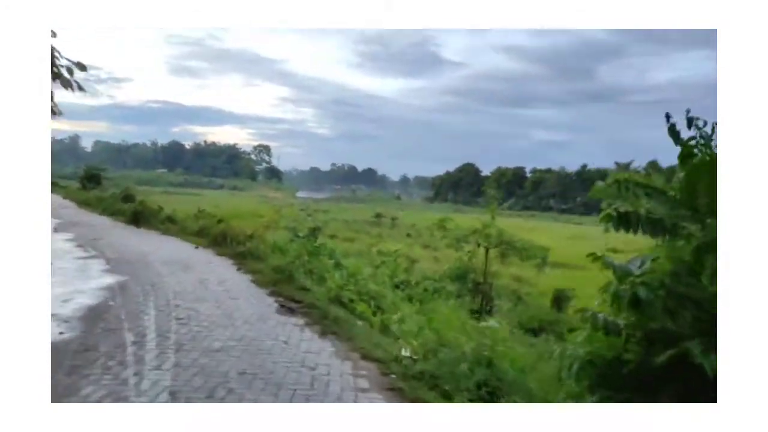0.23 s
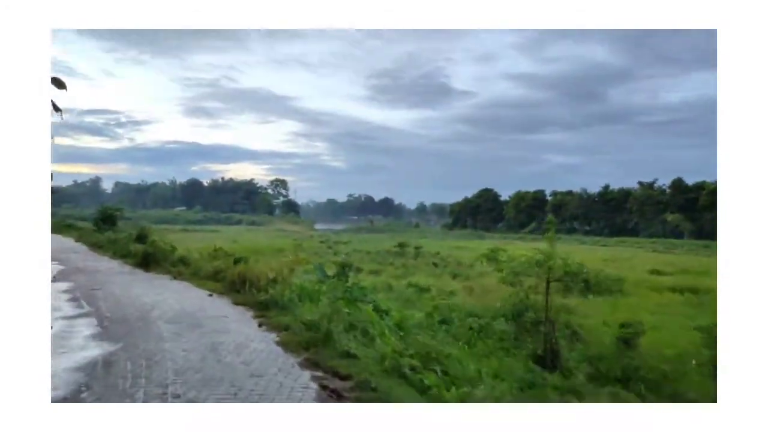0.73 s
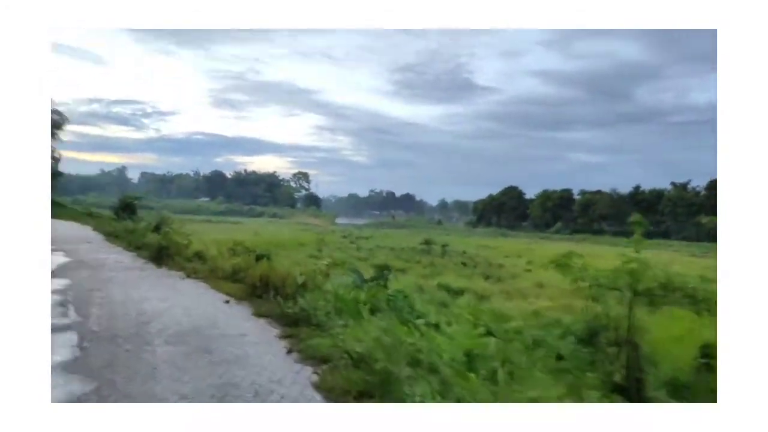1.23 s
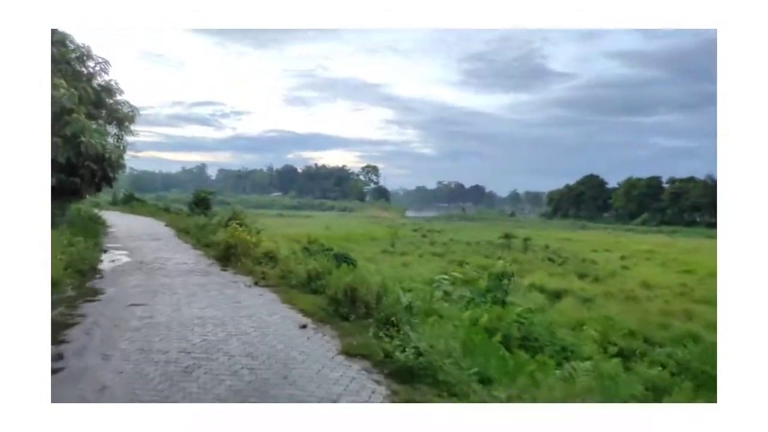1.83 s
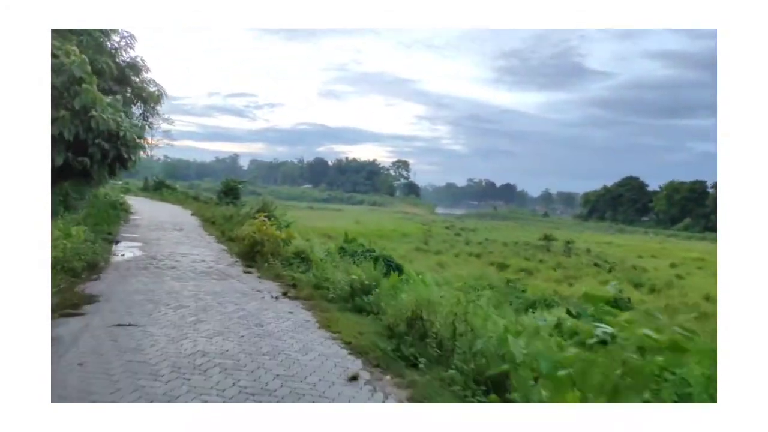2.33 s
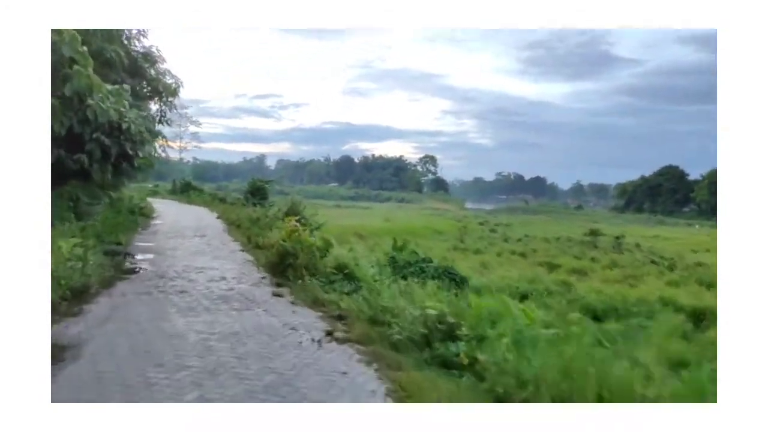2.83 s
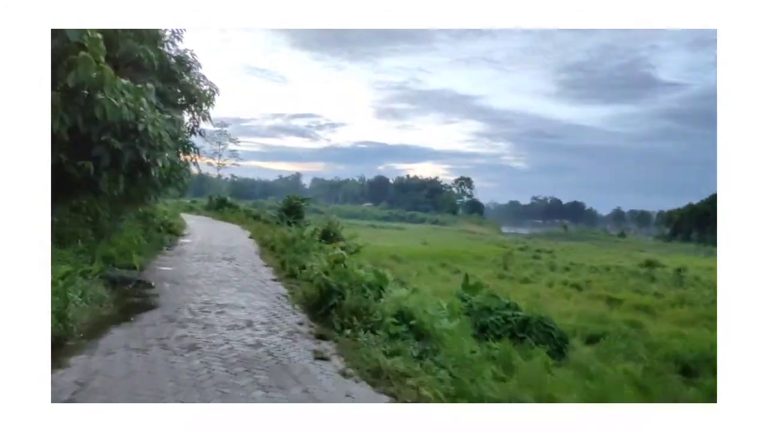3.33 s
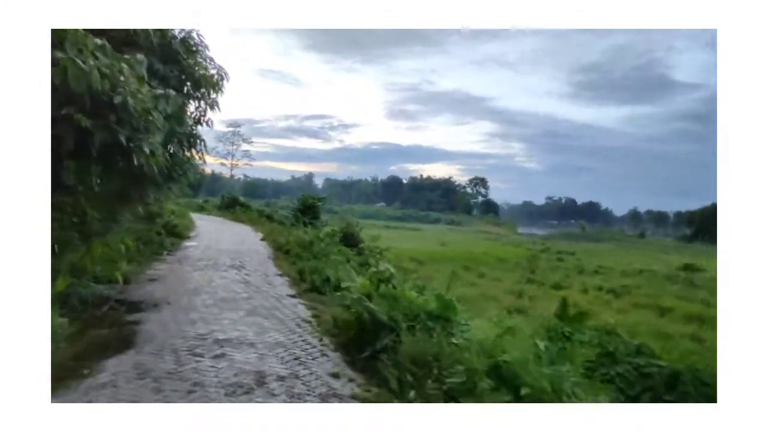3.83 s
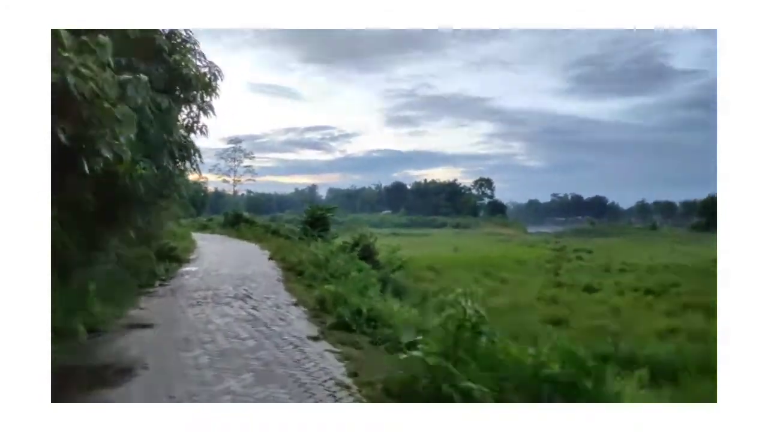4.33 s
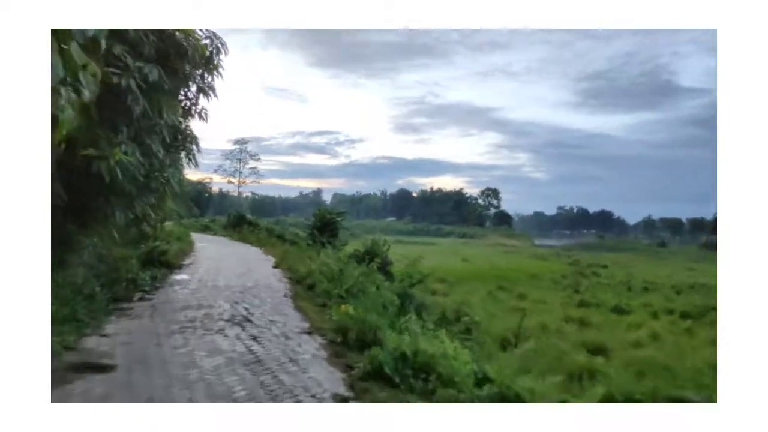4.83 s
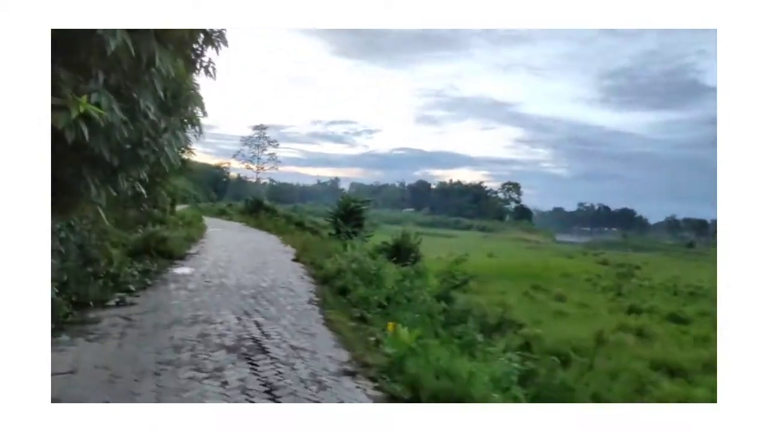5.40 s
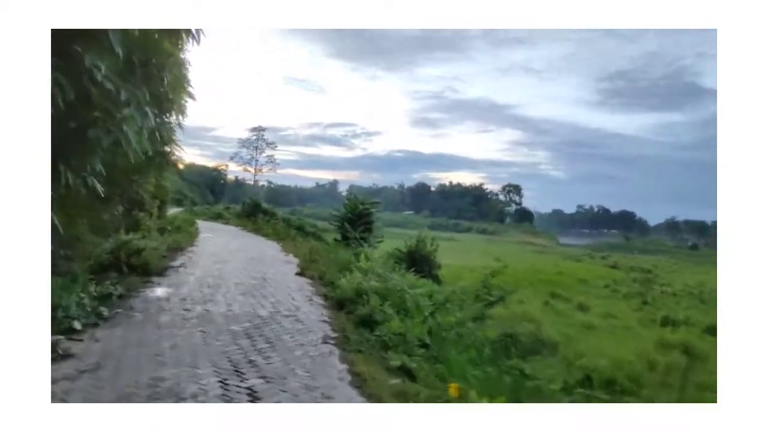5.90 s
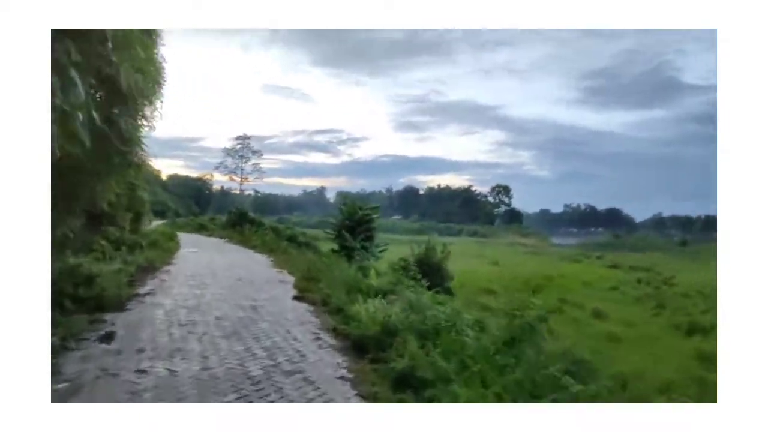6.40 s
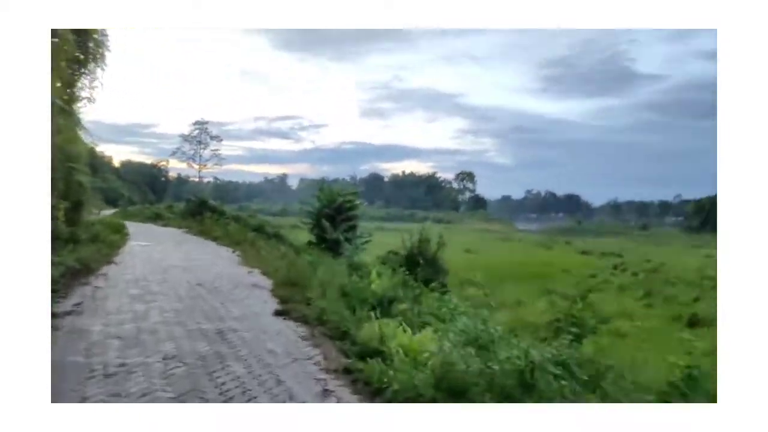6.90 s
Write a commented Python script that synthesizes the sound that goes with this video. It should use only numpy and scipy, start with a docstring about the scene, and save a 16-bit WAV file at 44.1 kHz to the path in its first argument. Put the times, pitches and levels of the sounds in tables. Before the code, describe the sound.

A small single-cylinder motorbike is already running on a brick lane between open fields, heard by a stereo microphone on board. Its low, rough putter, about 20 firings a second, climbs gradually to 24 by 6.3 s, with dry ticks, casing clatter, gear whine and a thin, swelling metallic ringing stronger on the right. Tyres rumble and boom unevenly beneath. High insect hiss is constant; fast cricket trills come from 0 to 1.6 s, then 5.5 to 6.6 s, leaning left. Low wind thumps the left side in irregular gusts, with a hard hit and dull panel knock at 1.8 s, further thumps around 2.3, 2.8 and 3.8 s, and dense buffeting from 5.7 s. Panels knock again at 5.7, 6.1 and 7.0 s. At 6.3 s the throttle closes: the engine quickly softens and drops in pitch, chain slapping lightly, while wind and tyre boom keep growing to the end.

```python
"""Small single-cylinder motorbike on a brick lane between fields at dusk, heard at two microphone ports.
From the start the engine gathers speed over rumbling tyres and crickets trill in the verge; wind thumps
the left port. Panels knock on a bad joint at 1.8 s; trills return at 5.5 s. At 6.3 s the throttle closes and
the note sinks while wind and tyre boom keep growing; panels knock again from 5.7 to 7.1 s.
Sines make engine orders, trills and rings; coloured noise makes wind, tyres and hiss."""
import sys
import numpy as np
from scipy import signal
from scipy.fft import rfft, irfft, next_fast_len
from scipy.io import wavfile
from scipy.ndimage import map_coordinates

SR = 44100
rng = np.random.default_rng(int(sys.argv[2]) if len(sys.argv) > 2 else 0)


def pcm_store(signal):
    """Save signal as 16-bit PCM."""
    levels = np.round(np.clip(np.atleast_2d(signal), -1, 1) * 32767)
    wavfile.write(sys.argv[1], SR, levels.astype(np.int16).T)


N = 315315
TIME_S = np.arange(N) / SR

# Far insects and air hiss at each port: (frequency [Hz], relative density [dB/Hz])
FIELD_LEFT_SPECTRUM = [(1000, -32), (1900, -22), (2450, -20), (2900, -15.5), (3200, -17), (3800, -11),
                       (4250, -17), (4900, -13.5), (5300, -14), (5850, -4.5), (6450, -9), (6800, 0),
                       (7200, -12), (7800, -12)]
FIELD_RIGHT_SPECTRUM = [(1000, -28), (2500, -16), (2900, -13), (3300, -17), (4400, -19), (5300, -17),
                        (5900, -11.5), (6500, -11), (6850, 1), (7100, -3), (7700, -2.5), (8000, -8)]
# Near cricket trills: (start [s], end [s], mid pitch [Hz], level before trim [dB])
CRICKET_TRILLS = [(0, .11, 6900, -59), (.24, .51, 6890, -57), (.66, .93, 6350, -63),
                  (.935, 1.35, 6320, -54), (1.05, 1.64, 6800, -55), (1.39, 1.6, 7050, -59),
                  (5.54, 6.55, 6780, -56.5), (5.95, 6.5, 6540, -56)]
# Wind turbulence: (frequency [Hz], relative density [dB/Hz])
WIND_SPECTRUM = [(12, -35), (25, -5), (50, 2), (90, 0), (140, -7), (200, -12.5), (300, -22), (450, -32),
                 (700, -44.5), (1500, -63.5), (4000, -84.5)]
# Gusts on the left port: (time [s], rise over headwind [dB])
LEFT_GUSTS = [(.35, 7), (.92, 3), (1.82, 6.5), (2.28, 1.5), (2.82, 2.5), (3.87, 1.5), (6.13, 4.5),
              (6.75, 5)]
# Gusts reaching the sheltered right port: (time [s], rise over lee wind [dB])
RIGHT_GUSTS = [(2.95, 5), (5.45, 6), (6.0, 8), (6.6, 9)]
# Single eddies on the left port:
# (time [s], peak before trim [dB], nominal pitch [Hz], half length [s], puff level before trim [dB])
EDDY_HITS = [(.173, -21.5, 172, 0.0096, -36), (0.42, -18, 118.7, 0.012, -33), (.98, -15.5, 110, 0.01, -42),
             (1.785, -7, 140, .010, -22.5), (2.221, -14.5, 109, 0.011, -39), (2.275, -11, 104, 0.0042, -31),
             (2.29, -18, 119, 0.0061, -35), (2.772, -15.5, 125, .008, -25.5),
             (2.824, -19.5, 123.5, 0.012, -38), (3.322, -12.5, 99, 0.0097, -34),
             (3.807, -12.5, 102.6, 0.012, -33), (3.851, -13, 161, 0.0048, -35),
             (3.865, -13, 110, 0.0068, -35), (3.88, -21, 106, 0.0093, -31.5),
             (4.522, -16, 129, 0.01, -38.5), (4.843, -14.5, 116.6, 0.0077, -27.5),
             (4.88, -15.5, 104.3, 0.013, -41), (5.709, -19, 150, 0.012, -37),
             (5.729, -17, 174, 0.0059, -30), (5.748, -10.5, 239, 0.0033, -22.5),
             (5.81, -11.5, 89.4, 0.0059, -30), (5.845, -20.5, 152, 0.013, -34),
             (5.928, -14, 105, 0.0048, -31.5), (6.001, -12, 115, 0.0042, -26.5),
             (6.042, -18.5, 167, 0.006, -37), (6.104, -7.5, 105, 0.0063, -25.5),
             (6.178, -11.5, 129, .006, -27), (6.211, -16, 105, .006, -33), (6.229, -14, 140, 0.0071, -24.5),
             (6.307, -13, 116.4, 0.0081, -41), (6.708, -15, 95, 0.0078, -31),
             (6.746, -11.5, 132, 0.0064, -29), (6.767, -14.5, 176.6, .005, -23),
             (6.824, -13.5, 105.3, 0.0074, -32.5), (6.97, -9, 100, 0.0064, -27.5),
             (6.994, -12, 141, 0.006, -23), (7.067, -24, 140, 0.0092, -28),
             (7.095, -11.5, 105.4, 0.0077, -29.5)]
# Fine turbulence in an eddy: (frequency [Hz], relative density [dB/Hz])
PUFF_SPECTRUM = [(110, -10), (220, 0), (320, -1), (430, -9), (600, -19), (800, -30), (1500, -54),
                 (4000, -87)]
# Boom of the hollow tyres: (frequency [Hz], relative density [dB/Hz])
DRUM_SPECTRUM = [(60, -7), (160, 1.5), (240, 0), (330, -7), (450, -10.5), (650, -12.5), (1000, -20),
                 (2500, -57.5)]
# Tyre rumble: (frequency [Hz], relative density [dB/Hz])
TYRE_SPECTRUM = [(30, -2), (70, 1.5), (170, -9), (300, 4), (480, -9), (730, -3.5), (1150, -10), (1600, -19),
                 (2200, -26.5), (4000, -28.5), (8000, -56)]
# Jolts at the worst joints: (time [s], strength [dB])
PANEL_JOLTS = [(1.777, -39), (5.744, -35.5), (6.104, -37), (6.98, -33.5), (6.994, -39), (7.064, -44)]
# Panel modes: (frequency [Hz], mean relative level [dB], t60 [s])
PANEL_MODES = [(453, 0, 0.025), (578, -6, 0.03), (647, -2.5, 0.036), (720, -3.5, 0.041), (856, -8.5, 0.032)]
# Level of the guard's sung note: (time [s], mean level [dB rms])
SING_LEVEL = [(0, -72), (.95, -73), (1.25, -64), (1.55, -63.5), (1.8, -69), (2.2, -64.5), (2.7, -64.5),
              (2.9, -70), (3.14, -63), (3.33, -68), (3.7, -64), (4.15, -67.5), (4.35, -62), (4.75, -71),
              (5.8, -71), (6.2, -65), (6.8, -73)]
# Firing rate, throttle open: (time [s], firings per second [Hz])
FIRING_RATE = [(0.0, 20.1), (0.56, 20.65), (0.95, 21.42), (1.81, 22.28), (2.02, 22.08), (2.21, 22.55),
               (3.16, 22.5), (3.41, 23.08), (3.72, 22.69), (4.13, 22.98), (4.27, 22.52), (4.76, 23.38),
               (4.99, 23.19), (5.25, 23.86), (5.46, 23.23), (6.29, 23.99)]
# Exhaust orders: (multiple of firing rate [-], level before trim and load [dB rms])
EXHAUST_ORDERS = [(1, -55), (2, -49.5), (3, -50), (4, -41.6), (5, -45.4), (6, -49), (7, -63), (8, -61),
                  (9, -50.5), (10, -50), (11, -59), (12, -52.5), (13, -56), (14, -55), (15, -58.5),
                  (16, -63), (17, -61), (18, -62), (19, -59.5), (20, -66)]
# Gear mesh tones: (multiple of firing rate [-], relative level [dB], phase waver [rad])
GEAR_TONES = [(17, -29, .4), (19, -34, .4), (23, -29, .5), (24, -22.3, .4), (35, -30, .5), (27, -31, .5),
              (40, -35, .6), (44, -27, .6), (85, -25, .8)]
# Engine casing resonances: (frequency [Hz], width [Hz], relative gain [dB])
CASING_MODES = [(430, 55, -4), (540, 28, -5), (620, 50, -11), (700, 18, -8), (775, 30, -5.5),
                (900, 55, -5.5), (995, 35, -9), (1118, 22, -11), (1205, 22, -16), (1300, 35, -14),
                (1690, 35, -21), (1752, 25, -21), (1888, 40, -20.5), (2020, 80, -25.5), (2145, 22, -26),
                (2410, 22, -22), (2700, 20, -26), (3540, 80, -25)]
# Chain guard resonances: (frequency [Hz], width [Hz], relative gain [dB])
GUARD_MODES = [(1372, 55, -1), (1498, 25, -4), (1527, 18, 0), (2900, 70, -22), (3820, 90, -16)]
# Dry tick of each firing: (frequency [Hz], relative density [dB/Hz])
TICK_SPECTRUM = [(600, -24), (1200, -0.5), (2200, -5), (3500, -15), (6000, -36.5)]
# Intake hiss: (frequency [Hz], relative density [dB/Hz])
INTAKE_SPECTRUM = [(1000, -16), (2300, 0), (3500, 1), (5200, 2), (6500, 4.5), (8000, -17.5)]
# Port level difference from below the rider: (frequency [Hz], left minus right [dB])
PORT_PAN = [(100, 3.5), (300, 0.5), (550, -1), (800, -1), (1000, -6.5), (1300, -7.5), (1550, -14),
            (1900, -18), (2500, -11), (3500, -1)]
# Port phase difference from below the rider: (frequency [Hz], left lead [rad])
PORT_LEAD = [(100, -.2), (300, -.8), (600, -.9), (950, -2.1), (1500, -1.6), (1700, -2.8), (2400, -.3),
             (3700, -.4), (4250, -3)]

# Hiss at mean firing rate, throttle open; gain per extra firing/s; change when coasting
HISS_LEFT_DB, HISS_RIGHT_DB, HISS_DB_PER_HZ, HISS_COAST_DB = -51.0, -51.5, 0.94, 1
# Far cricket, level before trim; pan is for all crickets, left minus right
FAR_HZ, FAR_DB, VERGE_PAN_DB = 6890, -66, 5
# Wind between gusts: level at 0 s, growth, gust width
WIND_DB, WIND_DB_PER_S, GUST_WIDTH_S = -31, 1.1645, 0.17
LEE_DB, LEE_DB_PER_S, LEE_GUST_WIDTH_S = -51.5, 2.3, 0.2
DRUM_DB, DRUM_DB_PER_S = -52.5, .4
# Tyre rumble at mean firing rate, throttle open; gain per extra firing/s; change when coasting
ROAD_DB, ROAD_DB_PER_HZ, ROAD_COAST_DB = -44.5, 0.5, -3.5
PANEL_PAN_DB = 6.5
SING_HZ, SING_WANDER_HZ = 1531, 5
# Throttle closing: start, time constant, full load drop, fall of firing rate
CLOSE_S, CLOSING_S, COAST_DB, SAG_HZ_PER_S = 6.3, 0.045, -11, 4.5
FIRST_FIRING_S = .023
# Silencer delay phase per order squared; hot-pipe phase wander, full from this order up
SPREAD_RAD, PIPE_WANDER_RAD, PIPE_WANDER_ORDER = .075, 1.0, 10
# Slack chain on its guard: rate, depth, time of one slap
SLAP_HZ, SLAP_DB, SLAP_S = 15, 3.5, 6.69
# Tick level at firing under load; decay constant as a share of the cycle
TICK_DB, TICK_CYCLES = -55.5, .04
TOP_HZ = 7800


def amp(db):
    """Decibels to gain."""
    return 10 ** (np.asarray(db) / 20)


def unit(x):
    """Scale to rms 1."""
    return x / np.sqrt(np.mean(x ** 2) + 1e-20)


def along(points, hz):
    """Interpolate (Hz, value) points on a log-frequency axis."""
    f, v = np.transpose(points)
    return np.interp(np.log(hz + 1), np.log(f + 1), v)


def curve(points):
    """Interpolate (s, value) points to one value per sample."""
    s, v = np.transpose(points)
    return np.interp(TIME_S, s, v)


def wobble(rate_hz):
    """Smooth random curve with rate_hz knots a second."""
    knots = rng.standard_normal(int(N * rate_hz / SR) + 4)
    return map_coordinates(knots, [np.arange(N) * rate_hz / SR])


def bell(s, width_s):
    """Smooth swell reaching 1 at time s."""
    return np.exp(-((TIME_S - s) / width_s) ** 2)


def filtered(x, response):
    """Apply a complex frequency response, zero-padded."""
    m = next_fast_len(N + SR // 2)
    return irfft(rfft(x, m) * response(np.fft.rfftfreq(m, 1 / SR)), m)[..., :N]


def noise(spectrum):
    """Gaussian noise of rms 1 with the given colour."""
    return unit(filtered(rng.standard_normal(N), lambda hz: amp(along(spectrum, hz))))


def panned(pan_db):
    """Left and right gains for a level difference."""
    return amp(np.array([[.5], [-.5]]) * pan_db)


def ports(x):
    """Sound from below the rider leads at the right port; the left is shaded from most of its treble."""
    half = np.array([[.5], [-.5]])

    def response(hz):
        return panned(along(PORT_PAN, hz)) * np.exp(1j * half * along(PORT_LEAD, hz))
    return filtered(x, response)


def ringing(modes, hz):
    """Minimum-phase, hence causal, response of a metal shell with resonant modes."""
    gain = np.sqrt(sum((amp(db) / (1 + ((hz - c) / w) ** 2)) ** 2 for c, w, db in modes))
    log_gain = np.log(gain + 1e-5)
    mirrored = np.r_[log_gain, log_gain[-2:0:-1]]
    return np.exp(np.conj(signal.hilbert(mirrored))[:len(hz)])


def motion():
    """Firing rate [Hz] and throttle closure (0-1); off the throttle the shaft slows evenly."""
    coasting_s = np.maximum(TIME_S - CLOSE_S, 0)
    rate_hz = curve(FIRING_RATE) - SAG_HZ_PER_S * coasting_s
    return rate_hz, 1 - np.exp(-coasting_s / CLOSING_S)


def under_way(db_per_hz, coast_db):
    """Level change [dB] with firing rate about its mean, and with throttle closure."""
    rate_hz, closed = motion()
    return db_per_hz * (rate_hz - rate_hz.mean()) + coast_db * closed


def field():
    """Countless far insects merge with the hiss of passing air: separate noise at each port."""
    left = amp(HISS_LEFT_DB) * noise(FIELD_LEFT_SPECTRUM)
    right = amp(HISS_RIGHT_DB) * noise(FIELD_RIGHT_SPECTRUM)
    change_db = under_way(HISS_DB_PER_HZ, HISS_COAST_DB)
    return np.array([left, right]) * amp(change_db + .4 * wobble(55))


def crickets(strokes_hz, trim_db, fall_hz, blur_rad, wander_hz, scatter_db):
    """Each wing stroke is a soft, falling note; strokes form fast trills, smeared by the grass."""
    out = np.zeros((2, N))
    far = (0.0016, N / SR, FAR_HZ, FAR_DB)  # no pause
    for start_s, end_s, hz, db in CRICKET_TRILLS + [far]:
        on = (TIME_S > start_s) & (TIME_S < end_s)
        stroke = ((TIME_S[on] - start_s) * strokes_hz + .025 * wobble(12)[on]) % 1
        pitch_hz = hz + fall_hz * (.5 - stroke) + wander_hz * wobble(13)[on]
        smear = blur_rad * np.array([wobble(200)[on], wobble(220)[on]])
        smear = smear + rng.uniform(0, np.pi, (2, 1))
        beat = .08 + .92 * np.sin(np.pi * stroke) ** 2
        size = beat * amp(db + trim_db + scatter_db * wobble(25)[on])
        note = np.sin(2 * np.pi * np.cumsum(pitch_hz) / SR + smear)
        out[:, on] += panned(VERGE_PAN_DB) * size * signal.windows.tukey(on.sum(), .1) * note
    return out


def buffet():
    """Wind turbulence at one port, in quick lumps, rms 1."""
    return unit(noise(WIND_SPECTRUM) * amp(1.2 * wobble(60) + .4 * wobble(9)))


def wind():
    """Growing turbulence buffets each port on its own; slower air in the lee is duller."""
    left_db = WIND_DB + WIND_DB_PER_S * TIME_S
    left_db = left_db + sum(db * bell(s, GUST_WIDTH_S) for s, db in LEFT_GUSTS)
    right_db = LEE_DB + LEE_DB_PER_S * TIME_S
    right_db = right_db + sum(db * bell(s, LEE_GUST_WIDTH_S) for s, db in RIGHT_GUSTS)
    sheltered = unit(filtered(buffet(), lambda hz: 1 / (1 + (hz / 100) ** 2)))
    return np.array([amp(left_db) * buffet(), amp(right_db) * sheltered])


def eddies(puff_share, lead_s, eddy_trim_db, puff_trim_db, wake_db, wake_s):
    """An eddy thumps low, swinging fastest at its core; finer turbulence rides its front and wake."""
    out = np.zeros(N + SR)
    t = np.arange(-SR // 25, SR // 10) / SR
    fine = np.pad(noise(PUFF_SPECTRUM), (0, SR))
    for s, db, hz, length_s, puff_db in EDDY_HITS:
        span = round(s * SR) + np.round(t * SR).astype(int)
        swell = np.exp(-(t / length_s) ** 2)
        swing_hz = hz * (.6 + .55 * swell)
        thump = swell * np.sin(2 * np.pi * (np.cumsum(swing_hz) / SR + rng.uniform()))
        front = np.exp(-((t + lead_s) / (puff_share * length_s)) ** 2)
        wake = (t > 0) * amp(wake_db) * np.exp(-np.abs(t) / wake_s)
        burst = np.maximum(front, wake)
        puff = unit(burst * fine[span]) * np.sqrt(np.mean(burst ** 2))
        out[span] += amp(db + eddy_trim_db) * thump + amp(puff_db + puff_trim_db) * puff
    return out[:N] * amp([[0], [-30]])  # left, right


def drumming():
    """Hollow tyres boom on the brick joints, more as the lane roughens, throttle open or not."""
    boom = noise(DRUM_SPECTRUM) * amp(2.3 * wobble(30))
    return amp(DRUM_DB + DRUM_DB_PER_S * TIME_S) * unit(ports(boom))


def tyres():
    """Tyres rumble over uneven bricks: part comes straight up, part is scattered by the lane."""
    pair = np.array([noise(TYRE_SPECTRUM), noise(TYRE_SPECTRUM)])
    scattered = filtered(pair, lambda hz: panned(along(PORT_PAN, hz)))
    roll = ports(noise(TYRE_SPECTRUM)) + .55 * scattered
    bricks = amp(1.4 * wobble(45))
    return amp(ROAD_DB + under_way(ROAD_DB_PER_HZ, ROAD_COAST_DB)) * bricks * unit(roll)


def rattles():
    """Each jolt knocks the panels: damped modes ring briefly and dully."""
    out = np.zeros(N + SR)
    t = np.arange(SR // 8) / SR
    for s, db in PANEL_JOLTS:
        ring = np.zeros(len(t))
        for hz, mode_db, t60_s in PANEL_MODES:
            decay = amp(mode_db + rng.normal(0, 1.7) - 60 * t / t60_s)
            ring += decay * np.sin(2 * np.pi * (hz * t + rng.uniform()))
        out[round(s * SR):][:len(t)] += amp(db) * ring * (1 - np.exp(-t / .0015))
    return out[:N] * panned(PANEL_PAN_DB)


def singing():
    """The guard's longest-ringing mode holds a thin, swelling note, whatever the engine speed."""
    hz = SING_HZ + SING_WANDER_HZ * wobble(9)
    size = amp(curve(SING_LEVEL) + .8 * wobble(18))
    phase = 2 * np.pi * np.cumsum(hz) / SR + .25 * wobble(45)
    return ports(np.sqrt(2) * size * np.sin(phase))


def whine(cycle):
    """Gear teeth mesh at fixed multiples of the firing rate, blurred by backlash."""
    out = np.zeros(N)
    for order, db, waver_rad in GEAR_TONES:
        tone = np.sin(2 * np.pi * order * cycle + waver_rad * wobble(50))
        out += amp(db) * unit(tone * amp(1.3 * wobble(6)))
    return out


def strikes(cycle, at, scatter_db):
    """One impulse per cycle at phase at, uneven in strength."""
    return np.diff(np.floor(cycle - at), prepend=np.floor(-at)) * amp(scatter_db * wobble(22))


def clatter(cycle, valve, knock_db, scatter_db):
    """Firing knock, closing valve, gears and churn shake the casing and the chain guard."""
    blows = strikes(cycle, 0, scatter_db) + valve * strikes(cycle, .14, scatter_db)
    # churn is partly each port's own, partly shared
    own = filtered(rng.standard_normal((2, N)),
                   lambda hz: along([(1550, .5), (1700, 1), (2500, .9)], hz))
    shared = filtered(rng.standard_normal(N),
                      lambda hz: along([(1550, 1), (1700, .5), (2500, .6)], hz))
    churn = unit((shared + own) * (1 + .2 * np.exp(-(cycle % 1) / .2)))
    gears = amp(under_way(db_per_hz=-1.0, coast_db=-7.5)) * whine(cycle)
    force = churn + amp(knock_db) * unit(blows) + gears
    casing = unit(filtered(force, lambda hz: ringing(CASING_MODES, hz)))
    guard = unit(filtered(force, lambda hz: ringing(GUARD_MODES, hz)))
    return casing, guard


def exhaust(cycle, scatter_db, jitter_cycles, drift_db):
    """One compact, uneven puff per firing; upper orders lag slightly, and swell and fade."""
    order, db = np.transpose(EXHAUST_ORDERS)
    wander = np.array([min(k / PIPE_WANDER_ORDER, 1) * wobble(.8) for k in order])
    drift = np.array([k / order.max() * wobble(1.993) for k in order])
    order = order[:, None]
    lag = SPREAD_RAD * order ** 2 + PIPE_WANDER_RAD * wander
    turn = cycle + jitter_cycles * wobble(22)
    size = amp(db[:, None] + drift_db * drift)
    note = np.sqrt(2) * np.sum(size * np.sin(2 * np.pi * order * turn - lag), axis=0)
    return note * amp(scatter_db * wobble(22))


def engine():
    """Exhaust, tick, clatter and intake hiss follow one shaft and one throttle."""
    rate_hz, closed = motion()
    load_db = COAST_DB * closed
    cycle = np.cumsum(rate_hz) / SR - FIRST_FIRING_S * rate_hz[0]
    puffs = amp(load_db + 2.1) * exhaust(cycle, scatter_db=.8, jitter_cycles=.002, drift_db=1.5)
    tick = amp(TICK_DB + load_db) * noise(TICK_SPECTRUM) * np.exp(-(cycle % 1) / TICK_CYCLES)
    casing, guard = clatter(cycle, valve=.5, knock_db=-10, scatter_db=1.5)
    # the slack chain slaps its guard off the throttle
    guard = guard * amp(closed * SLAP_DB * np.cos(2 * np.pi * SLAP_HZ * (TIME_S - SLAP_S)))
    metal = amp(-47.5 + 0.39 * load_db) * casing + amp(-59 + 0.083 * load_db) * guard
    intake = amp(-58.9 + .8 * load_db) * np.array([noise(INTAKE_SPECTRUM), noise(INTAKE_SPECTRUM)])
    return ports(puffs + tick + metal) + intake


def scene():
    """Sum of all sources at the rider's two microphone ports."""
    insects = field() + crickets(strokes_hz=29, trim_db=1.7, fall_hz=90, blur_rad=.62,
                                 wander_hz=16, scatter_db=1.4)
    gusts = wind() + eddies(puff_share=1.05, lead_s=.001, eddy_trim_db=-1.3, puff_trim_db=-.3,
                            wake_db=-9, wake_s=.035)
    return insects + gusts + drumming() + tyres() + rattles() + singing() + engine()


def record(dry):
    """The microphone input fades in over 6 ms and cuts steeply above its band limit."""
    opening = np.minimum(TIME_S / .006, 1)
    return filtered(dry * opening, lambda hz: 1 / np.sqrt(1 + np.minimum(hz / TOP_HZ, 2) ** 150))


dry = scene()
out = record(dry)
pcm_store(out)
```